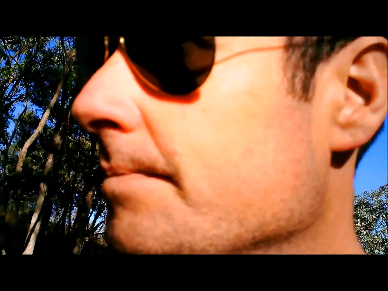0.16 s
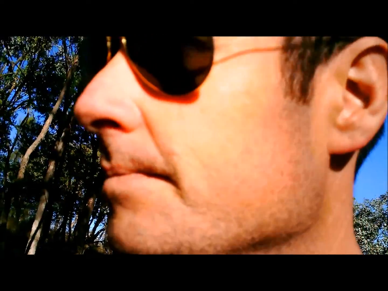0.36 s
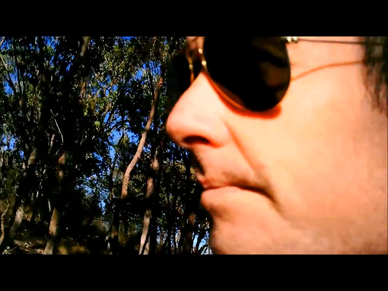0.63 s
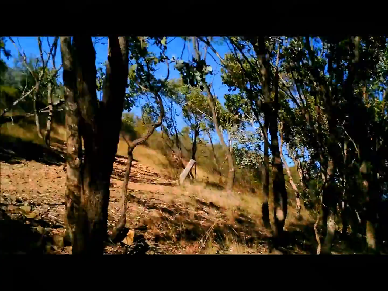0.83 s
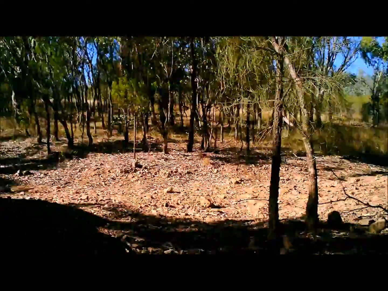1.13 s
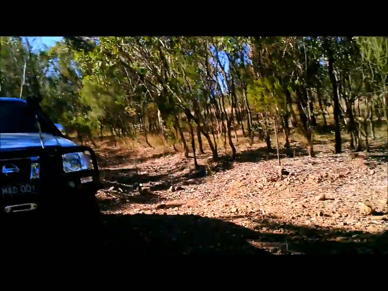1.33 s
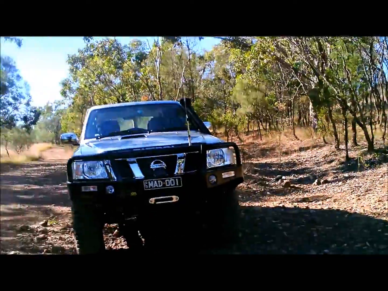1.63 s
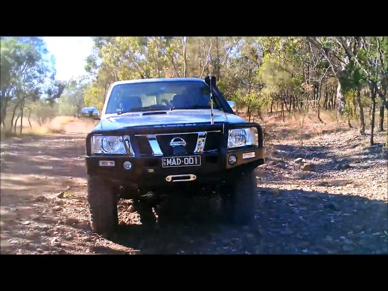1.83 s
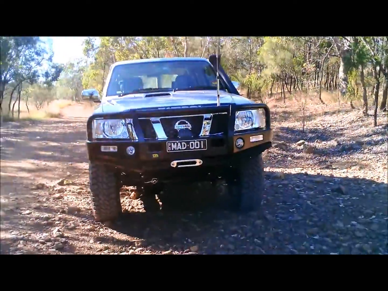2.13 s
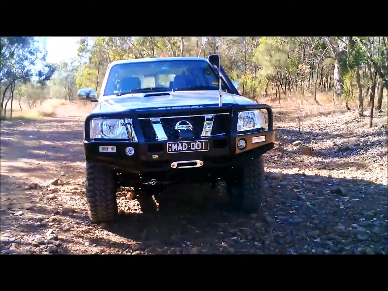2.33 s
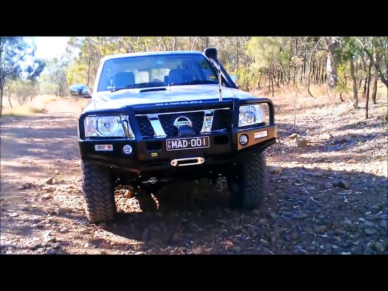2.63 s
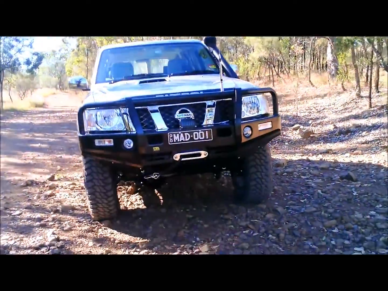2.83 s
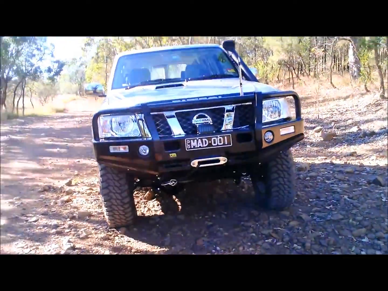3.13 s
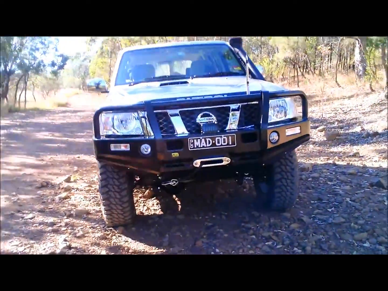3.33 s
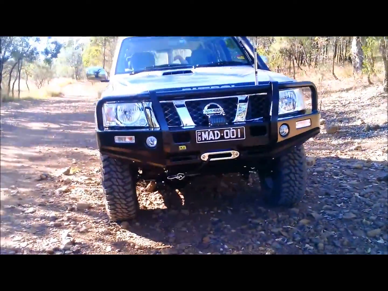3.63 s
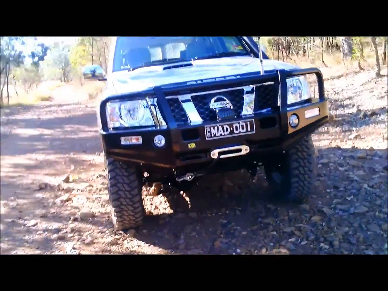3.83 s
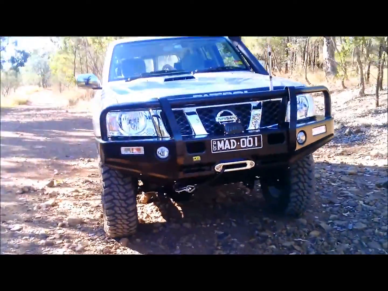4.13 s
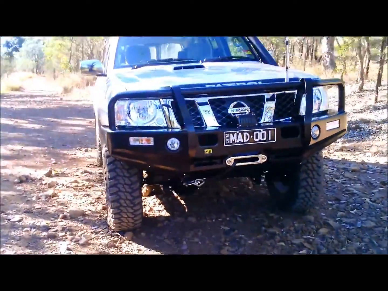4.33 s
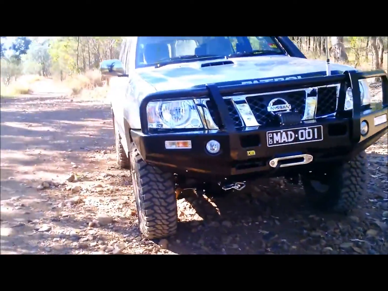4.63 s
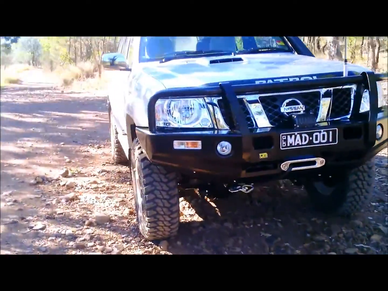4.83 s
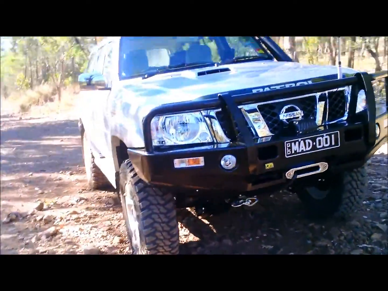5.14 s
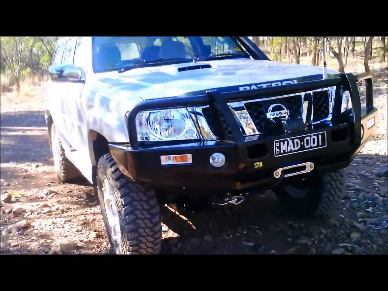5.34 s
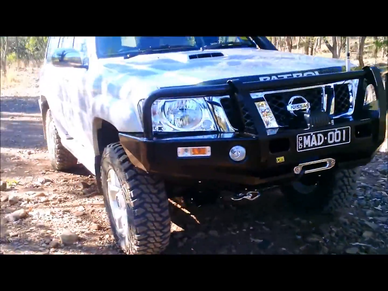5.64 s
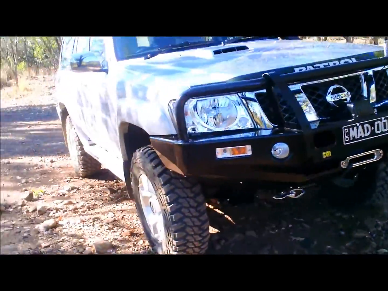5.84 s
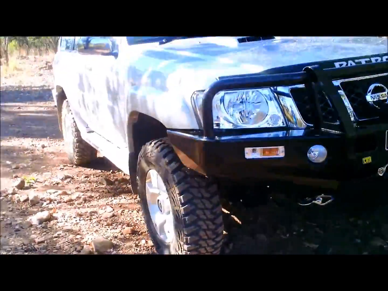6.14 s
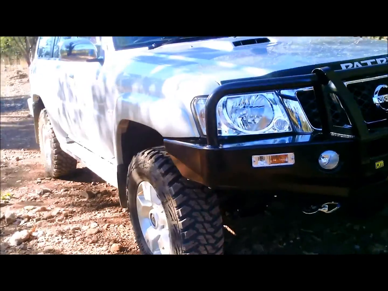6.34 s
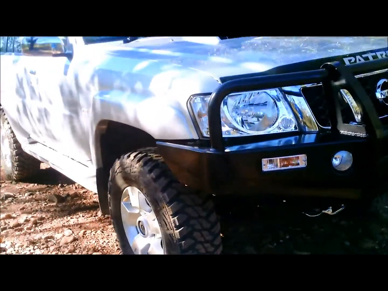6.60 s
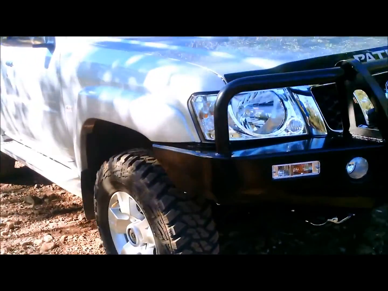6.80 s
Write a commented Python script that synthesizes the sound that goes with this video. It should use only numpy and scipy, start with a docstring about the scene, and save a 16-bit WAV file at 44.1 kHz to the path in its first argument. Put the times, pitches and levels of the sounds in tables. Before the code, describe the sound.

A four-wheel drive's diesel engine idles outdoors, clattering and throbbing, while air hisses steadily out of its tyres. Early on, the hand-held microphone swings round with a few sharp clicks and a dull bump. It is then carried towards a front wheel with soft thumps, knocking stones and a brief gravel scuff, and the engine and hiss grow somewhat louder. Light wind rumbles underneath.

```python
"""Airing down on a bush track

A four-wheel drive idles, its four-cylinder diesel clattering and throbbing, while deflators hiss at
the tyres. One microphone on a hand-held camera, in light wind: it starts facing away, swings round
and is walked up to a front wheel, so the vehicle grows louder. Close by, the case clicks and bumps
in the hand and a shoe scuffs the gravel; a low hum sounds briefly near the end of the walk."""
import sys
import numpy as np
from scipy import signal
from scipy.fft import rfft, irfft, next_fast_len
from scipy.io import wavfile
from scipy.ndimage import map_coordinates

SR = 44100
rng = np.random.default_rng(int(sys.argv[2]) if len(sys.argv) > 2 else 0)


def transcribe(u):
    """Save the signal u as a 16-bit wav file named by the first command-line argument.

    u: samples, shape (n,) or (channels, n), limited to [-1, 1]; the rate is SR.
    q: integer samples, one column per channel.
    """
    v = np.clip(np.atleast_2d(u).T, -1, 1)
    q = np.round(v * 32767).astype(np.int16)
    wavfile.write(sys.argv[1], SR, q)


N = 307288


def amp(db):
    """Decibels to gain."""
    return 10 ** (np.asarray(db) / 20)


def unit(x):
    """Scale to rms 1."""
    return x / np.sqrt(np.mean(x ** 2) + 1e-20)


def curve(rows):
    """One value per sample from (t/s, value) rows."""
    return np.interp(np.arange(N) / SR, *np.transpose(rows))


def ramp(start_s, length_s):
    """Rises from 0 to 1 over length_s."""
    return np.clip((np.arange(N) / SR - start_s) / length_s, 0, 1)


def stretch(start_s, end_s, fade_s):
    """Fades in from start_s, holds at 1 and fades out from end_s."""
    return ramp(start_s, fade_s) - ramp(end_s, fade_s)


def swells(rows):
    """A smooth swell for each (t/s, level/dB, half-width/s) row."""
    t = np.arange(N) / SR
    return sum(amp(db) * np.exp(-((t - s) / width) ** 2) for s, db, width in rows)


def wobble(rate):
    """A smooth random curve, rate knots a second."""
    return map_coordinates(rng.standard_normal(int(N * rate / SR) + 4), [np.arange(N) * rate / SR])


def filtered(x, response):
    """x through a response given as a function of frequency."""
    size = next_fast_len(N + SR // 2)
    return irfft(rfft(x, size) * response(np.fft.rfftfreq(size, 1 / SR)), size)[:N]


def colour(points, hz):
    """Gain of (f/Hz, level/dB) points, read on a log axis."""
    f, db = np.transpose(points)
    return amp(np.interp(np.log(hz + 1), np.log(f + 1), db))


def noise(points):
    """Coloured noise of rms 1."""
    return unit(filtered(rng.standard_normal(N), lambda hz: colour(points, hz)))


def add(track, s, sound):
    """Mix a sound into the track at time s."""
    part = track[round(s * SR):][:len(sound)]
    part += sound[:len(part)]


TURN = (0.71, 0.97)  # the microphone swings round to the vehicle: start/s, length/s
SIDESTEP = (3.15, 3.1)  # it moves round beside the wheel arch: start/s, length/s
WALK_S, WALK_END_S, WALK_FADE_S = 3.2, 5.55, 0.2

# The way up to the wheel, as the clatter at the microphone: t/s, level/dB
APPROACH_LEVEL = [(0.0, -42), (0.62, -41), (1.1, -37), (1.41, -36.5), (1.96, -35.5), (3.76, -34.5),
                  (3.97, -33), (6.2, -32.5), (6.96, -31)]
def nearness():
    """Decibels of clatter above the -36 dB heard standing back from the vehicle."""
    return curve(APPROACH_LEVEL) + 36


# Idle speed, in firings: t/s, f/Hz
FIRING_RATE = [(0, 25.2), (.8, 25.05), (4, 25), (4.35, 24.55), (4.7, 24.85), (5.8, 25.02), (7, 25.04)]
def firing_count():
    """Firings of the engine so far, at each sample."""
    return np.cumsum(curve(FIRING_RATE)) / SR


def cycle_noise(firings, period, share):
    """Noise of which a share of the power comes back alike every period firings."""
    points_per_firing = SR // 25
    pattern = rng.standard_normal(period * points_per_firing)
    again = np.interp(firings * points_per_firing, np.arange(len(pattern)), pattern, period=len(pattern))
    return np.sqrt(share) * again + np.sqrt(1 - share) * rng.standard_normal(N)


# Each cylinder's knock, in firing order: relative level/dB
CYLINDER_DB = [0, 0.85, 0.23, 1.33]
def knocks(firings, lead, rise, fall, between, scatter_db, grit_db):
    """A burst of tiny impacts at each firing; lead, rise and fall are shares of a firing period."""
    count = firings + lead
    index, age = np.floor(count).astype(int) + len(CYLINDER_DB), count % 1
    size_db = np.take(CYLINDER_DB, index, mode="wrap") + scatter_db * rng.standard_normal(256)[index]
    burst = (1 - np.exp(-(age / rise) ** 2)) * np.exp(-age / fall)
    envelope = np.hypot(unit(burst * amp(size_db)), between)  # valve gear ticks on between firings
    impacts = cycle_noise(firings, len(CYLINDER_DB), share=0.33)
    return envelope * amp(grit_db * wobble(450)) * impacts


# Resonances of the engine block: f/Hz, width/Hz, level/dB
BLOCK_MODES = [(1218, 120, -12), (1393, 135, 1), (1606, 123, 0.5), (1883, 210, -4), (2455, 420, -10.5),
               (3300, 1400, -14)]
# Overall contour of those resonances: f/Hz, level/dB
BLOCK_CONTOUR = [(300, -47.5), (800, -34.5), (1050, 1.5), (1300, -1), (4000, -4.5), (6000, -1),
                 (10000, -5.5)]
def block(hz):
    """Response of the engine block: damped modes of alternating sign."""
    ring = sum((-1) ** k * amp(db) * 1j * hz * width / (centre ** 2 - hz ** 2 + 1j * hz * width)
               for k, (centre, width, db) in enumerate(BLOCK_MODES))
    return ring * colour(BLOCK_CONTOUR, hz)


def clatter(firings, near_db):
    """Diesel knock rings the block, louder as the microphone closes in."""
    impacts = knocks(firings, lead=0.23, rise=0.21, fall=0.25, between=0.45, scatter_db=1, grit_db=1.25)
    return amp(-36 + near_db) * unit(filtered(impacts, block))


# Spectrum of the rattle out of the wheel arch: f/Hz, level/dB
ARCH_SPECTRUM = [(300, -28), (440, -10.5), (620, -22.5), (800, -9.5), (890, 0), (980, -5), (1200, 6),
                 (1600, -11.5), (3000, -6.5), (5000, -16), (9000, -40)]
def arch_rattle(firings, near_db, away, beside):
    """Knock rattles out of the wheel arch, which opens to the microphone as it comes alongside."""
    impacts = knocks(firings, lead=0.14, rise=0.14, fall=0.44, between=1, scatter_db=4.5, grit_db=2)
    level_db = -57.5 + near_db + 11 * away + 15.5 * beside
    return amp(level_db) * unit(filtered(impacts, lambda hz: colour(ARCH_SPECTRUM, hz)))


# Spectrum of the engine's drone: f/Hz, level/dB
DRONE_SPECTRUM = [(20, 3.5), (60, 0), (120, -2), (220, -1.3), (320, -2.5), (420, -9.5), (560, -19.5),
                  (800, -17), (1500, -50)]
def drone(near_db, away):
    """The engine's dull drone, stronger while the microphone faces away."""
    return amp(-45.5 + 0.97 * near_db + 8.5 * away) * noise(DRONE_SPECTRUM)


# Exhaust overtones, heard from further back: multiple of the firing rate, relative level/dB
EXHAUST_OVERTONES = [(2, -15.5), (3, -34), (4, -26), (7, -30), (9, -23.5), (12, -30.5), (13, -30),
                     (15, -30.5), (16, -36.5), (17, -33), (19, -34.5)]
def exhaust(firings, near_db, beside):
    """The exhaust puffs half a period after each firing; its overtones gain 5 dB beside the wheel."""
    throb = -np.cos(2 * np.pi * firings) * amp(wobble(4))
    for multiple, db in EXHAUST_OVERTONES:
        drift = rng.uniform(0, 2 * np.pi) + 0.5 * wobble(3.014)
        gain = amp(db + 5 * beside + 2.7 * wobble(2.4))
        throb += gain * np.cos(2 * np.pi * multiple * firings + drift)
    return amp(-33 + 0.5 * near_db) * throb


# Spectrum of the air escaping at the tyres: f/Hz, level/dB
JET_SPECTRUM = [(300, -43.5), (700, -12.5), (1100, 1.5), (1500, 12), (2200, 6), (3000, 2), (4000, 0.5),
                (4800, -0.5), (5800, -1.5), (6600, 0), (7300, -0.5), (8600, 2), (9500, 2.5)]
def deflators(near_db):
    """Jets of air leave the valves as an even, slightly fluttering hiss."""
    return amp(-32 + 0.56 * near_db + 0.28 * wobble(8)) * noise(JET_SPECTRUM)


# Spectrum of wind right on the microphone: f/Hz, level/dB
WIND_SPECTRUM = [(10, -1.5), (20, -9.5), (40, -7.5), (80, -13), (150, -17.5), (400, -64), (1000, -78.5)]
def wind():
    """Light air buffets the microphone in lumps, more while it is swung round or carried forward."""
    walking = stretch(WALK_S, WALK_END_S, WALK_FADE_S)
    turning = np.sqrt(np.abs(np.sin(np.pi * ramp(*TURN))))
    lumps = amp(3.5 * wobble(10))
    return amp(-41.5 + 2.5 * walking + 3 * turning) * unit(lumps * noise(WIND_SPECTRUM))


def regular_cracks(firings, near_db, lag_periods=0.9, scatter_db=1.2):
    """One (t/s, peak/dB) row for each firing, harder in the stronger cylinders."""
    at = np.searchsorted(firings, np.arange(lag_periods, firings[-1]))
    cylinder_db = np.take(CYLINDER_DB, np.arange(len(at)) + 1, mode="wrap")
    chance_db = scatter_db * rng.standard_normal(256)[:len(at)]
    return list(zip(at / SR, -31 + near_db[at] + 2.4 * cylinder_db + chance_db))


# Injections that stand out at the microphone: t/s, peak/dB
HARD_CRACKS = [(0.913, -19.5), (4.9585, -20), (5.8434, -16.5), (6.7595, -16.5), (6.8363, -17),
               (6.8784, -16.5), (6.9231, -16)]
def injection_cracks(firings, near_db):
    """Each injection hits the block with a sharp crack; a few hit much harder."""
    out, t = np.zeros(N), np.arange(SR // 30) / SR
    hz = np.fft.rfftfreq(len(t), 1 / SR)
    body = block(hz) / np.hypot(1, (hz / 2800) ** 2)  # too blunt a blow to stir the top modes much
    for s, db in HARD_CRACKS + regular_cracks(firings, near_db):
        blow = rng.standard_normal(len(t)) * np.exp(-t / 0.0014)
        ring = irfft(rfft(blow) * body)
        add(out, s, amp(db) * ring / np.abs(ring).max())
    return out


# Clicks of the case, right at the microphone: t/s, ring/dB, f/Hz, snap/dB, push/dB
CASE_CLICKS = [(1.0189, -2, 1140, -18, -14), (1.0672, 4.5, 1185, -23, -2), (1.0845, -16, 1010, -55, -15.5),
               (1.3991, 10.5, 1034, -6.5, -2), (1.558, -25, 1010, -55, -18), (1.5756, -16, 1170, -53, -17)]
# Modes of the whole case: f/Hz, level against the struck spot/dB, t60/s
CASE_MODES = [(773, -14, 0.022), (1310, -24, 0.0052)]
# Spectrum of the snap: f/Hz, level/dB
SNAP_SPECTRUM = [(300, -14), (2000, -7), (3800, 5.5), (5000, -11.5), (6500, -0.5), (8500, -5.5),
                 (10000, -3)]
def case_clicks(push_s=0.0017):
    """The plastic case snaps and rings briefly as its wall is pushed in and springs back."""
    out, t = np.zeros(N), np.arange(SR // 6) / SR
    crackle = noise(SNAP_SPECTRUM)
    ring_onset = 1 - np.exp(-(t / 0.0012) ** 2)
    for s, ring_db, spot_hz, snap_db, push_db in CASE_CLICKS:
        modes = [(spot_hz, 0, 0.0125)] + list(CASE_MODES)  # the struck spot has its own pitch
        ring = sum(amp(db - 60 * t / t60) * np.sin(2 * np.pi * hz * t) for hz, db, t60 in modes)
        snap = amp(snap_db - 60 * t / 0.0062) * crackle[round(s * SR):][:len(t)]
        push = amp(push_db) * (1 - t / push_s) * np.exp(-t / push_s) * (1 - np.exp(-t / 0.0001))
        add(out, s, amp(ring_db) * ring * ring_onset + snap + push)
    return out


def jolts(per_s=6, db=-27.5, hz=62):
    """Small random jolts of the camera through the walk, as (t/s, level/dB, f/Hz) rows."""
    chance = rng.uniform(-0.82, 1, (64, 3))
    times = np.arange(WALK_S + WALK_FADE_S, WALK_END_S, 1 / per_s)
    return [(s + late / per_s / 2, db + 3 * size, hz * 1.5 ** pitch)
            for s, (late, size, pitch) in zip(times, chance)]


# Hand and step, carried through the camera to the microphone: t/s, level/dB, f/Hz
SOFT_BUMPS = [(1.338, -24, 131), (1.522, -10.5, 68.6), (3.404, -22.5, 39.8), (3.578, -24.5, 111),
              (3.647, -23, 40.4), (3.726, -23, 70), (3.803, -24, 70), (3.857, -20, 61.6), (3.875, -16, 55)]
def bumps():
    """Each soft bump gives the camera one heavily damped swing."""
    out, t = np.zeros(N), np.arange(SR // 6) / SR
    for s, db, hz in SOFT_BUMPS + jolts():
        cycles = hz * t
        add(out, s, amp(db) * np.sin(2 * np.pi * cycles) * np.exp(-((cycles - 0.35) / 0.56) ** 2))
    return out


# The hand shifts on the camera: t/s, level/dB, half-width/s
HAND_RUBS = [(1.575, -32.5, 0.02), (3.62, -43.5, 0.16), (3.872, -28, 0.023), (3.985, -40, 0.014)]
# Spectrum of the rubbing: f/Hz, level/dB
RUB_SPECTRUM = [(30, -9), (90, 3), (280, 1.5), (420, -33), (800, -32), (1300, -17), (3000, -69.5)]
def rubs():
    """The hand rubs the case in short, dull swells."""
    return swells(HAND_RUBS) * noise(RUB_SPECTRUM)


# Loose stones underfoot, on the way to the wheel: t/s, level/dB, f/Hz
STONE_CLACKS = [(3.263, -23.5, 1030), (3.395, -30.5, 1030), (5.1275, -21.5, 1105)]
def stones():
    """Stones knock together, each with a dry, broad clack around its pitch."""
    out, t = np.zeros(N), np.arange(SR // 10) / SR
    for s, db, hz in STONE_CLACKS:
        clack = noise([(hz / 2, -30), (hz * 1.3, -4), (hz, 0), (hz * 2, -12), (hz * 5, -28)])[:len(t)]
        add(out, s, amp(db - 60 * t / 0.068) * clack * (1 - np.exp(-t / 0.0008)))
    return out


# A shoe on the track, below the microphone: t/s, level/dB, half-width/s
SHOE_SCUFF = [(4.011, -26.5, 0.014)]
# Spectrum of sliding gravel: f/Hz, level/dB
GRAVEL_SPECTRUM = [(1000, -25), (3000, -2), (6000, 1.5), (9500, -2.5)]
def scuff():
    """A shoe slides over gravel with a brief, grainy rasp."""
    return swells(SHOE_SCUFF) * unit(amp(1.1 * wobble(500)) * noise(GRAVEL_SPECTRUM))


def hum():
    """A low, wavering hum comes in, holds for a moment and stops."""
    hz = 173 + 2 * wobble(6.2)
    envelope = stretch(start_s=4.93, end_s=5.16, fade_s=0.068)
    return amp(-36.5) * envelope * np.sin(2 * np.pi * np.cumsum(hz) / SR)


def scene():
    """Everything at the one hand-held microphone, from back on the track to beside the wheel."""
    near_db, firings = nearness(), firing_count()
    away, beside = 1 - ramp(*TURN), ramp(*SIDESTEP)
    engine = clatter(firings, near_db) + arch_rattle(firings, near_db, away, beside)
    engine += drone(near_db, away) + exhaust(firings, near_db, beside)
    engine += injection_cracks(firings, near_db)
    around = engine + hum() + deflators(near_db)
    on_microphone = wind() + rubs() + case_clicks() + bumps()
    underfoot = scuff() + stones()
    return (around + on_microphone + underfoot)[None]


def gain_control(x, threshold_db, recovery_db_per_s):
    """Peaks over the threshold pull the gain down within milliseconds; it creeps back afterwards."""
    over_db = np.maximum(20 * np.log10(np.minimum(np.abs(x), 1) + 1e-9) - threshold_db, 0)
    recovery_db = recovery_db_per_s * np.arange(N) / SR
    cut_db = np.maximum.accumulate(over_db + recovery_db) - recovery_db
    pole = np.exp(-1 / (0.0066 * SR))
    return x * amp(-signal.lfilter([1 - pole], [1, -pole], cut_db))


NOTCH_HZ, TOP_HZ = 7900, 9650
def record(dry):
    """The camera rides its gain, clips the highest peaks, notches the treble and cuts off the top."""
    held = np.clip(gain_control(dry[0], threshold_db=-4.5, recovery_db_per_s=24), -0.95, 0.95)
    notch = lambda hz: (1 - np.exp(-((hz - NOTCH_HZ) / 360) ** 2)) ** 2
    return filtered(held, lambda hz: notch(hz) * (hz < TOP_HZ))[None]


dry = scene()
out = record(dry)
transcribe(out)
```